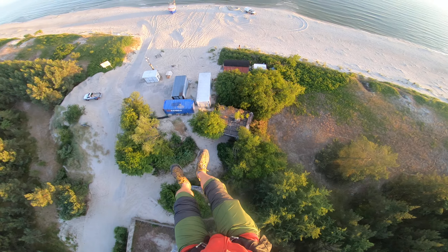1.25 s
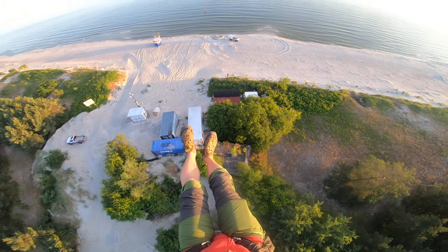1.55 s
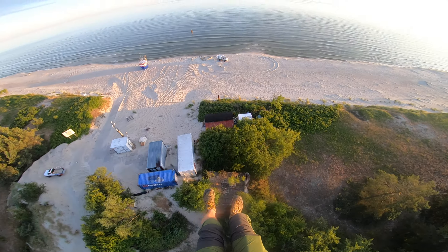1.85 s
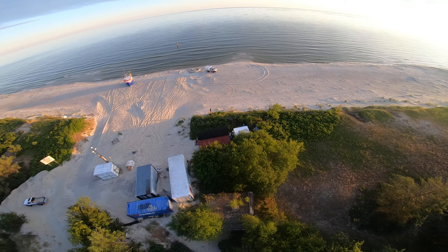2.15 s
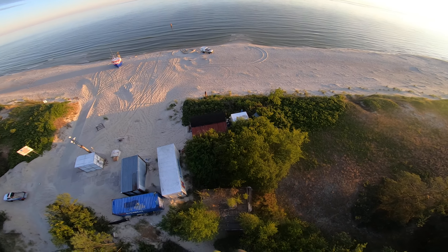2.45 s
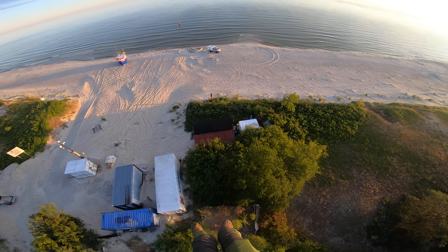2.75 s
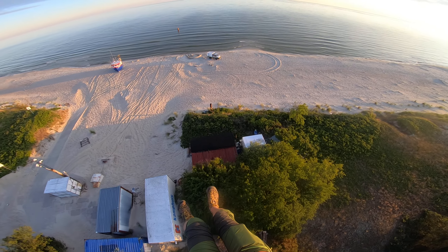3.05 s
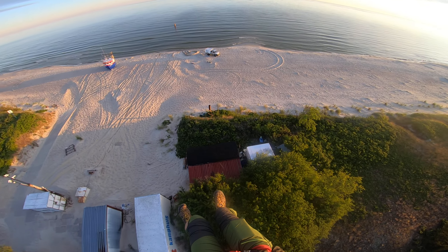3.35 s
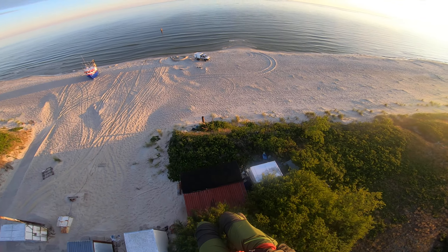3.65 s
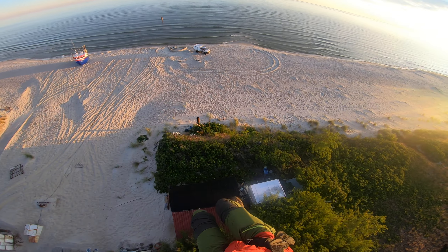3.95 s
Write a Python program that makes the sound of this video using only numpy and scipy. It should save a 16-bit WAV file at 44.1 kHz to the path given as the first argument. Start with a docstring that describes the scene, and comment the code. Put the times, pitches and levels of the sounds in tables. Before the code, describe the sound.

Rushing wind of a fall grows into a gusty roar, following brief gear knocks and rustles.

```python
"""Wind of a free fall

A jumper drops from a height above a beach, a microphone worn on the body. At the leap the harness
thumps, buckles click, clothing rustles and a strap slides. Then the air rushes past ever faster,
and eddies beat on the microphone, first in single gusts and at last as a steady low roar."""
import sys
import numpy as np
from scipy import signal
from scipy.fft import rfft, irfft
from scipy.io import wavfile
from scipy.ndimage import uniform_filter1d, minimum_filter1d

SR = 44100
rng = np.random.default_rng(int(sys.argv[2]) if len(sys.argv) > 2 else 0)


def waveform_to_disk(signal):
    """Save audio, clipped to [-1, 1], as 16-bit WAV at the path in sys.argv[1]."""
    frames = np.transpose(np.atleast_2d(signal))
    scaled = np.clip(frames, -1, 1) * 32767
    samples = np.round(scaled).astype(np.int16)
    wavfile.write(sys.argv[1], SR, samples)


N = 176400
TIME = np.arange(N) / SR
CLOTH_GRAIN_DB, CLOTH_GRAIN_HZ = 3, 130


def from_db(db):
    """Decibels to gain."""
    return 10 ** (np.asarray(db) / 20)


def rms_one(x):
    """Scale to rms 1."""
    return x / np.sqrt(np.mean(x ** 2) + 1e-20)


def in_time(rows):
    """Turn rows of a time and its values into one automation curve per value."""
    seconds, *columns = np.transpose(rows)
    return [np.interp(TIME, seconds, column) for column in columns]


def at_hz(colour, hz):
    """Read a spectrum in dB along a log-frequency axis."""
    points_hz, db = np.transpose(colour)
    return np.interp(np.log(hz), np.log(points_hz), db)


def drift(hz):
    """A smooth random wobble, mostly slower than hz, at rms 1."""
    pole = np.exp(-2 * np.pi * hz / SR)
    wobble = signal.lfilter([1], [1, -2 * pole, pole * pole], rng.standard_normal(N + SR))
    return rms_one(wobble[SR:])


def swell(centre, half_width, order=2):
    """A bell-shaped envelope of height 1; a higher order steepens its sides."""
    return np.exp(-2 * np.minimum(np.abs((TIME - centre) / half_width) ** order, 20))


def noise(colour):
    """Noise of the given colour with the subsonics rolled off, at rms 1."""
    hz = np.maximum(np.arange(N // 2 + 1) * SR / N, 1)
    low_cut = hz ** 2 / (hz ** 2 + 10 ** 2)
    return rms_one(irfft(rfft(rng.standard_normal(N)) * from_db(at_hz(colour, hz)) * low_cut, N))


def friction(colour, grain_db, grain_hz):
    """The grain of rubbing fabric: noise whose level flickers quickly, at rms 1."""
    return rms_one(noise(colour) * from_db(grain_db * drift(grain_hz)))


def buffeting():
    """Eddies beat on the microphone: a booming roar and single gusts over a deep rumble."""
    # The running roar. Each row: time in seconds, level in dB, corner in Hz above which it fades.
    eddies = [(0,-26.5,220),(.1,-23.5,190),(.25,-31.5,130),(.4,-28,157),(.55,-31,264),(.8,-33.5,293),(1.45,-32,353),(1.66,-28.5,400),(1.74,-19,450),(1.88,-21.5,425),(1.985,-24,437),(2.03,-29,405),(2.47,-28,486),(2.55,-16,406),(2.79,-17.5,483),(2.9,-19,540),(3.1,-20.5,620),(3.22,-13.5,600),(3.5,-14,560),(3.69,-17.5,506),(3.85,-15,468),(4,-22.5,530)]
    # Single gusts. Each row: centre and half-width in seconds, level in dB, corner in Hz.
    gusts = [(0.136,0.0047,-28,400),(0.471,.032,-18,170),(1.755,0.015,-10.5,387),(1.785,0.014,-16,340),(1.829,.012,-14.5,570),(1.843,0.016,-13,380),(2.54,0.016,-19,750),(3.032,0.0048,-16.5,950),(3.078,0.013,-16.5,240),(3.116,0.011,-15,650),(3.197,0.019,-16,700),(3.398,0.013,-25.5,380),(3.563,0.012,-18,420),(3.721,0.019,-17.5,220)]
    # Slow, deep buffeting. Each row: time in seconds, level in dB.
    rumble = [(0,-26.5),(.07,-14.5),(.22,-25.5),(.46,-22),(.54,-27.5),(.8,-36.5),(1.4,-33.5),(1.8,-26.5),(2.1,-30),(2.6,-24.5),(3.7,-43),(4,-22)]
    # The rumble's sub-bass weight. Each row: frequency in Hz, relative level in dB.
    rumble_colour = [(18,-2.5),(35,3),(70,1.5),(120,0.5),(220,-30.5),(500,-50),(1500,-99.5)]
    roar_db, corner_hz = in_time(eddies)
    power = from_db(roar_db) ** 2
    weighted_hz = power * corner_hz
    for centre, half_width, db, hz in gusts:
        gust_power = (from_db(db) * swell(centre, half_width, order=4)) ** 2
        power += gust_power
        weighted_hz += gust_power * hz  # a strong gust pulls the corner toward its own
    roar = turbulence(np.sqrt(power), weighted_hz / power)
    rumble_db, = in_time(rumble)
    return boom(roar) + from_db(rumble_db) * noise(rumble_colour)


def turbulence(level, corner_hz):
    """Eddies in half-octave bands: faster air lifts the corner, and the pressure comes in lumps."""
    # The eddies' tone before the roll-off. Each row: frequency in Hz, relative level per hertz in dB.
    eddy_colour = [(20,-6.5),(45,-13.5),(85,0.5),(180,-0.1),(400,-5),(900,-6.5),(1600,-9),(2800,-12),(4500,-27.5),(6200,-32.5),(9000,-36.5)]
    fall_db_per_oct, steep_db_per_oct = 9.5, 19
    steep_ratio = 4.3  # the steeper fall joins in at this multiple of the corner
    lump_db, lump_rate_hz, lump_above_hz = 1.5, 50, 100
    edges = 20 * 2 ** (np.arange(19) / 2)
    white = rng.standard_normal((2, N + SR))
    lumps = lump_db * drift(lump_rate_hz)
    roar, power = 0, 0
    for k, (low, high) in enumerate(zip(edges, edges[1:])):
        hz = np.sqrt(low * high)
        band = signal.sosfilt(signal.butter(2, [low, high], "band", fs=SR, output="sos"), white[k % 2])
        band = signal.sosfilt(signal.butter(2, 2 * low, fs=SR, output="sos"), band)[SR:]
        ratio = hz / corner_hz
        fall_db = fall_db_per_oct * np.log2(1 + ratio ** 2) / 2
        fall_db += steep_db_per_oct * np.log2(1 + (ratio / steep_ratio) ** 4) / 4
        gain = from_db(at_hz(eddy_colour, hz) - fall_db) * np.sqrt(high - low)
        roar += gain * rms_one(band * from_db(lumps * hz / (hz + lump_above_hz)))
        power += gain ** 2
    return level * roar / np.sqrt(power)


def boom(roar, hz=218.5, width_hz=26, mix_db=-11.5):
    """The roar booms slightly around one low pitch."""
    resonance = signal.lfilter(*signal.iirpeak(hz, hz / width_hz, fs=SR), roar)
    return roar + from_db(mix_db) * resonance


def rush(flutter_db=0.5, flutter_hz=30):
    """Air streams past the body: a broad rush with hiss and thin air on top."""
    # The passing air. Each row: time in seconds, then the levels of body, hiss and air in dB.
    levels = [(.25,-51.5,-67.5,-84.5),(.7,-48,-63.5,-84),(.87,-49.5,-68.5,-89),(1.0,-46,-69,-87.5),(1.17,-45,-66,-82),(1.38,-38,-57.5,-77.5),(1.6,-33,-52.5,-72.5),(1.8,-30,-49,-66.5),(2.1,-34,-50.5,-68.5),(2.45,-31,-49.5,-65.5),(2.65,-30,-53,-67.5),(3.119,-44,-52,-66),(3.501,-33.5,-59,-73.5),(3.981,-42,-66.5,-80.5)]
    # The tones of those three layers. Each row: frequency in Hz, relative level in dB.
    body_colour = [(30,-9.5),(130,-13),(300,-7.5),(600,-7),(1200,-9),(2000,-14),(3100,-23),(4000,-38),(5500,-74)]
    hiss_colour = [(2200,-22),(3400,1.5),(3900,0.5),(4900,-6),(5600,-13),(6300,-25.5),(8000,-50)]
    air_colour = [(4500,-23),(6000,-1),(6700,0.5),(7900,0.5),(9000,-8),(10200,-18),(11500,-39),(14000,-67)]
    flutter = flutter_db * drift(flutter_hz)
    layers = zip(in_time(levels), (body_colour, hiss_colour, air_colour))
    return sum(from_db(db + flutter) * noise(colour) for db, colour in layers)


def bright_rush(flutter_db=0.5, flutter_hz=35):
    """Near full speed a brighter, lightly fluttering rush opens up."""
    # A sudden entry and a long fade. Each row: time in seconds, level in dB.
    levels = [(2.7,-63),(2.728,-28.5),(2.88,-31),(3.05,-29),(3.55,-43),(4,-65)]
    # Midrange-heavy wind. Each row: frequency in Hz, relative level in dB.
    colour = [(300,-21.5),(900,5),(1700,0.5),(2500,-5.5),(3200,-12),(4000,-27),(5500,-51.5)]
    db, = in_time(levels)
    return from_db(db - flutter_db * drift(flutter_hz)) * noise(colour)


def whoosh(width_hz=200):
    """As the fall begins, a hollow resonance of the airflow lifts a little, then sinks in pitch."""
    # The resonance's path. Each row: time in seconds, level in dB, centre in Hz.
    sweep = [(.5,-70,512.3),(.63,-39,560),(.78,-48,620.7),(.91,-37.5,372),(1.05,-60,308)]
    db, hz = in_time(sweep)
    phase = 2 * np.pi * np.cumsum(hz) / SR
    band = drift(width_hz) * np.cos(phase) + drift(width_hz) * np.sin(phase)
    return from_db(db) * rms_one(band)


def harness_thumps():
    """The harness jolts the microphone: each thump is a soft pressure swing between two rebounds."""
    # Dull jolts. Each row: centre in seconds, peak in dB, pitch in Hz.
    jolts = [(.073,-8,70),(0.166,-14.5,89),(.224,-11,63),(0.33,-15.5,54.4),(0.472,-10.5,86),(0.573,-11,115),(0.973,-14.5,130)]
    thumps = 0
    for centre, db, hz in jolts:
        spread = np.minimum((np.pi * hz * (TIME - centre)) ** 2, 20)
        thumps += from_db(db) * (1 - 2 * spread) * np.exp(-spread)
    return thumps


def scuffs():
    """Cloth drags close to the microphone in grainy strokes that start and stop abruptly."""
    # Close drags. Each row: centre and half-width in seconds, level in dB.
    strokes = [(0.062,0.044,-33),(0.164,0.021,-28),(0.379,0.01,-29),(0.44,0.012,-32),(0.479,0.024,-23.5)]
    # Their muffled tone. Each row: frequency in Hz, relative level in dB.
    colour = [(120,3),(330,1),(700,-6),(1230,-14.5),(1500,-22.5),(5000,-65)]
    envelope = sum(from_db(db) * swell(centre, half_width, order=4) for centre, half_width, db in strokes)
    return envelope * friction(colour, CLOTH_GRAIN_DB, CLOTH_GRAIN_HZ)


def clothing():
    """Clothing rubs in soft, grainy swells at the leap."""
    # Rustles. Each row: centre and half-width in seconds, level in dB.
    rubs = [(0.01,0.076,-40),(0.099,0.091,-40),(0.216,0.034,-45),(0.364,0.11,-49.5),(0.444,0.016,-37),(0.55,0.06,-44),(0.61,0.014,-41),(0.647,0.043,-49)]
    # The fabric's tone. Each row: frequency in Hz, relative level in dB.
    colour = [(200,2.5),(800,1.5),(1350,-9),(1600,7.5),(1900,-4),(2900,-9.5),(3650,-8),(4700,-29),(6200,-41),(8500,-39),(11500,-54)]
    envelope = sum(from_db(db) * swell(centre, half_width) for centre, half_width, db in rubs)
    return envelope * friction(colour, CLOTH_GRAIN_DB, CLOTH_GRAIN_HZ)


def strap_slide():
    """A strap slides ever faster, runs free and settles."""
    # The slide's rise and fall. Each row: time in seconds, level in dB.
    levels = [(.24,-82),(.272,-62.5),(.35,-55.5),(.415,-45.5),(.445,-42.5),(.463,-57),(.49,-72),(.56,-67),(.75,-86)]
    # The bright rasp of webbing. Each row: frequency in Hz, relative level in dB.
    colour = [(800,-13),(2300,6),(3500,7),(5400,-2.5),(7000,-6),(9000,-20.5),(11500,-34.5)]
    db, = in_time(levels)
    return from_db(db) * friction(colour, grain_db=2.5, grain_hz=300)


def buckles(contact_s=0.0016, ring_db=-5.5, ring_top_hz=4000, tick_s=0.007, tick_trim_db=-2):
    """Harness gear knocks together: short, rough contacts tick and set the damped buckles ringing."""
    # Knocks. Each row: start in seconds, relative levels of the strike and its bright tick in dB.
    knocks = [(0.0421,-21,-53),(0.0648,-26,-55),(0.085,-28,-51),(0.141,-33,-62),(0.225,-43,-45),(0.269,-50,-49),(0.289,-42,-51),(0.3265,-50,-43),(0.3504,-42,-45),(0.4302,-36,-35.5),(0.514,-40,-48.5),(0.548,-39,-59),(.567,-45,-48),(0.6025,-28.5,-62),(0.655,-49,-46),(0.7728,-34.5,-64)]
    # Buckle resonances. Each row: frequency in Hz, relative level in dB, seconds to fade by 60 dB.
    modes = [(837,3.5,0.039),(1050,3,0.019),(1190,8.5,0.01),(1584,-12,0.047),(1840,-6.5,0.028),(2410,-8,0.038),(2670,-6.5,0.025),(3660,-26,0.049),(4640,-23.5,0.026)]
    # The tick's sharp tone. Each row: frequency in Hz, relative level in dB.
    tick_colour = [(1500,-17),(3500,15),(5400,0.5),(6500,-14),(9000,-21),(11500,-30)]
    contacts, ticks, ring = 0, 0, 0
    for start, strike_db, tick_db in knocks:
        age = np.maximum(TIME - start, 0)
        contacts += from_db(strike_db) * (age > 0) * np.exp(-np.minimum(age / contact_s, 20))
        ticks += from_db(tick_db) * (age > 0) * np.exp(-np.minimum(age / tick_s, 20))
    for hz, db, t60 in modes:
        pole, angle = from_db(-60 / (t60 * SR)), 2 * np.pi * hz / SR
        force = contacts * rng.standard_normal(N) / np.sqrt(contact_s * SR / 2)
        mode = signal.lfilter([0, np.sin(angle)], [1, -2 * pole * np.cos(angle), pole ** 2], force + 1e-18)
        ring += from_db(db + ring_db) * mode
    ring = signal.sosfilt(signal.butter(2, ring_top_hz, fs=SR, output="sos"), ring)
    return ring + from_db(tick_trim_db) * ticks * noise(tick_colour)


def scene():
    """Wind, harness and clothing at one microphone."""
    wind = buffeting() + rush() + bright_rush() + whoosh()
    return (wind + harness_thumps() + scuffs() + clothing() + strap_slide() + buckles())[None]


def record(dry, ceiling=0.62, reaction_s=0.0072, cutoff_hz=12500):
    """A quick limiter holds the strongest lumps down; the top is cut steeply."""
    window = int(reaction_s * SR)
    gain = minimum_filter1d(ceiling / np.maximum(np.abs(dry), ceiling), 2 * window)
    gain = uniform_filter1d(uniform_filter1d(gain, window), window)
    return signal.sosfilt(signal.cheby2(12, 70, cutoff_hz, fs=SR, output="sos"), dry * gain)


dry = scene()
out = record(dry)
waveform_to_disk(out)
```